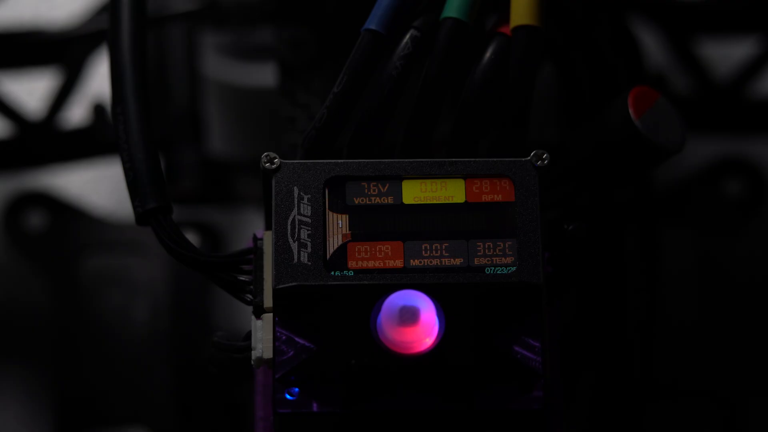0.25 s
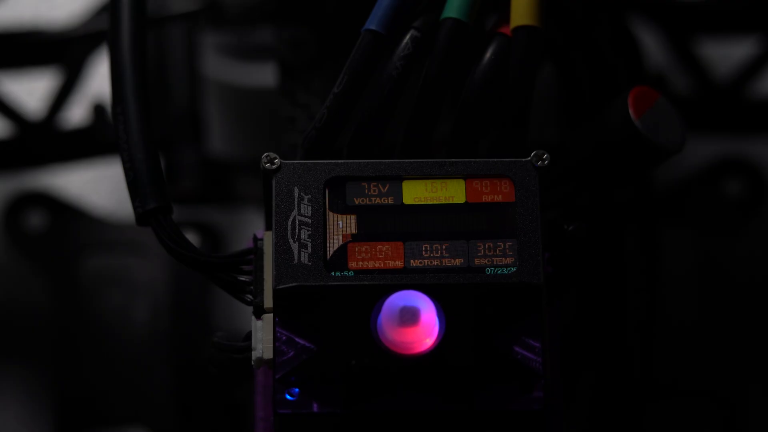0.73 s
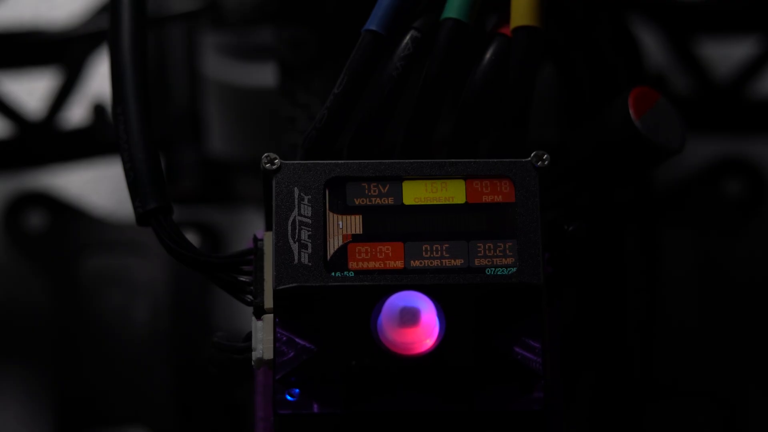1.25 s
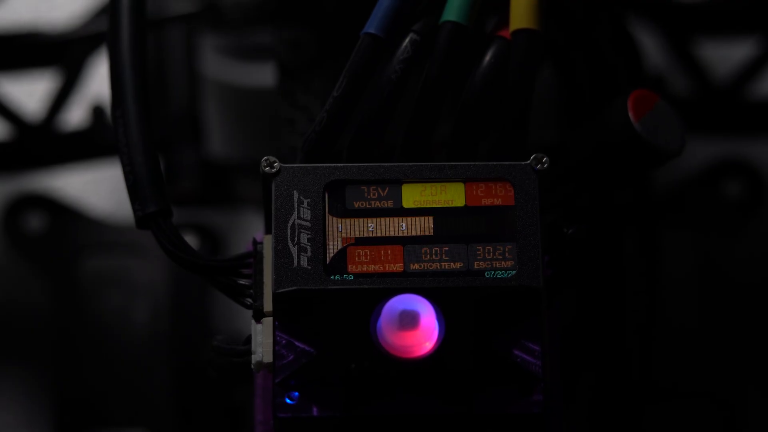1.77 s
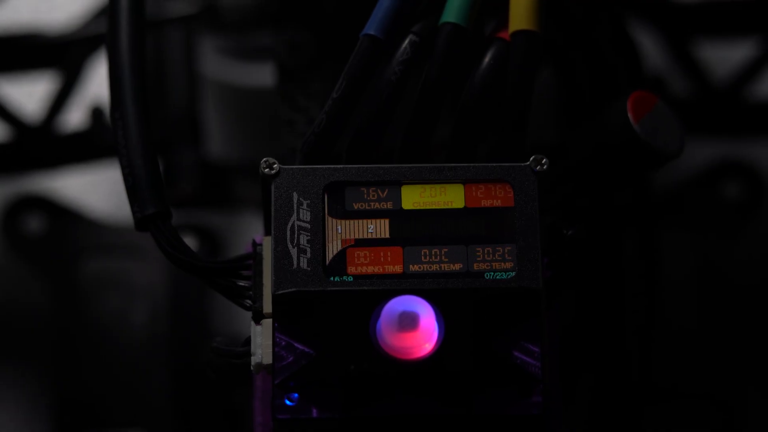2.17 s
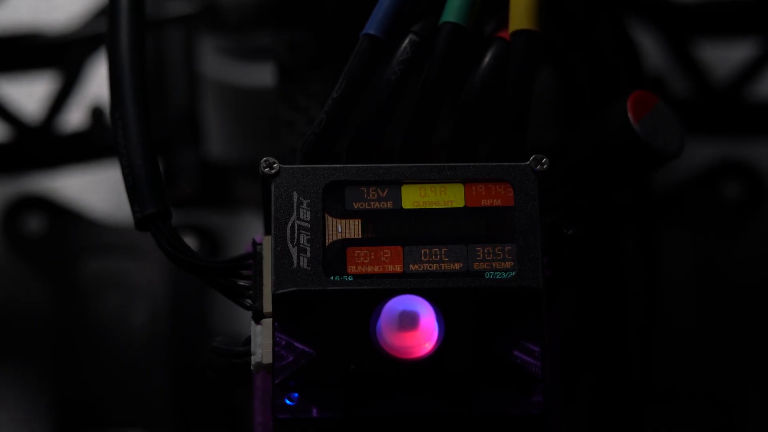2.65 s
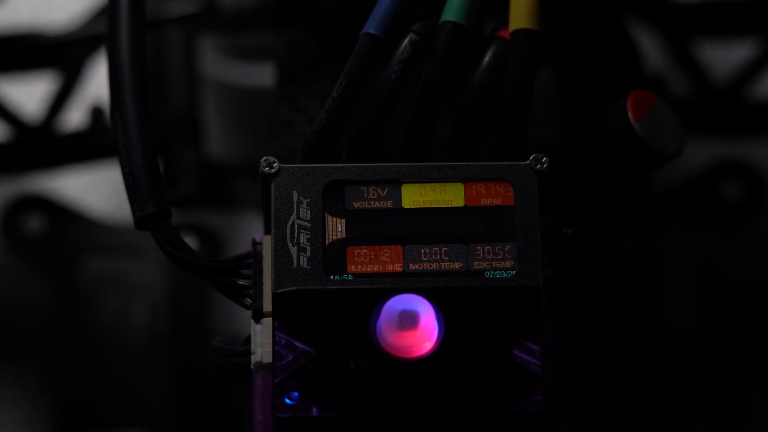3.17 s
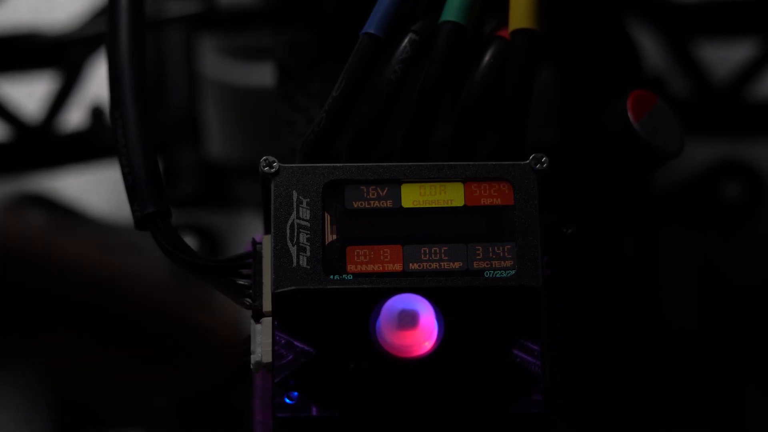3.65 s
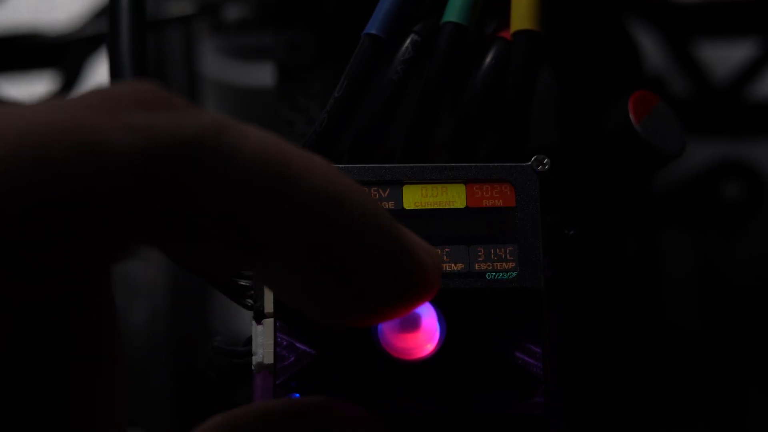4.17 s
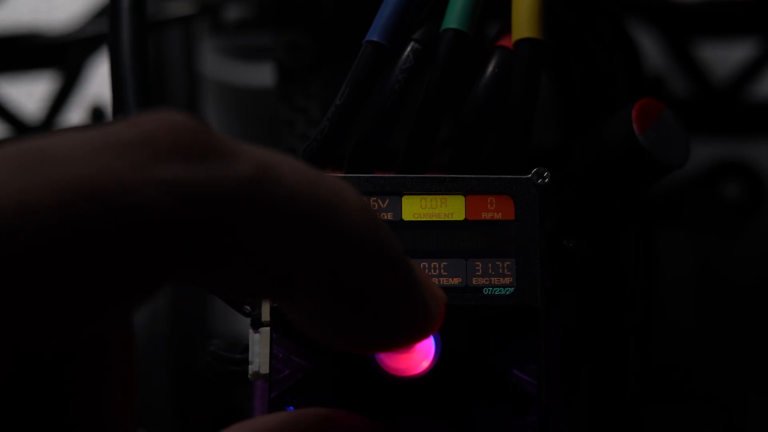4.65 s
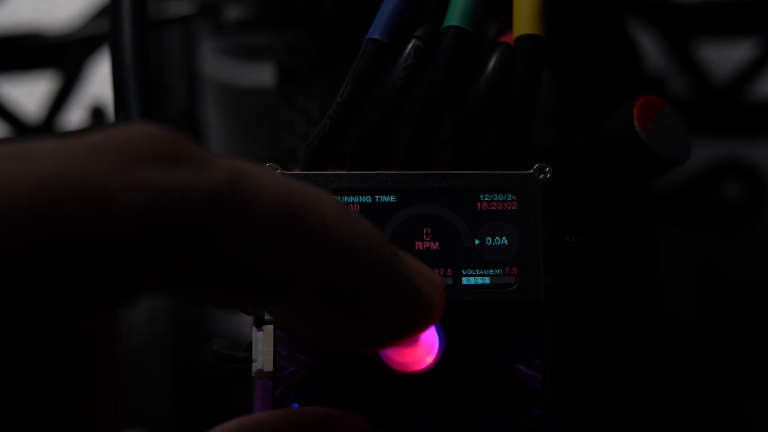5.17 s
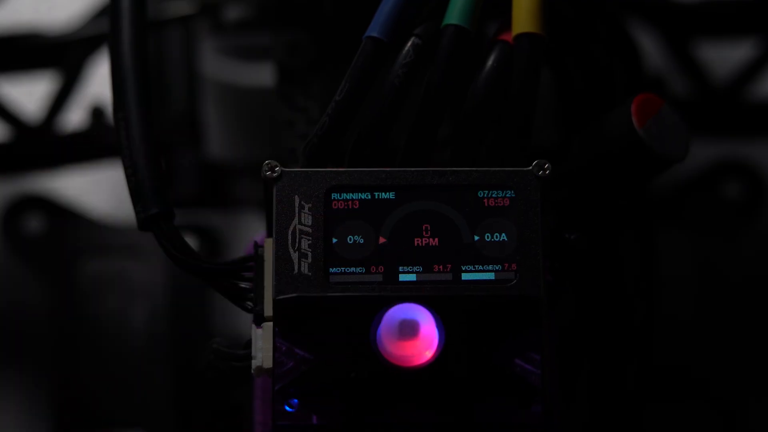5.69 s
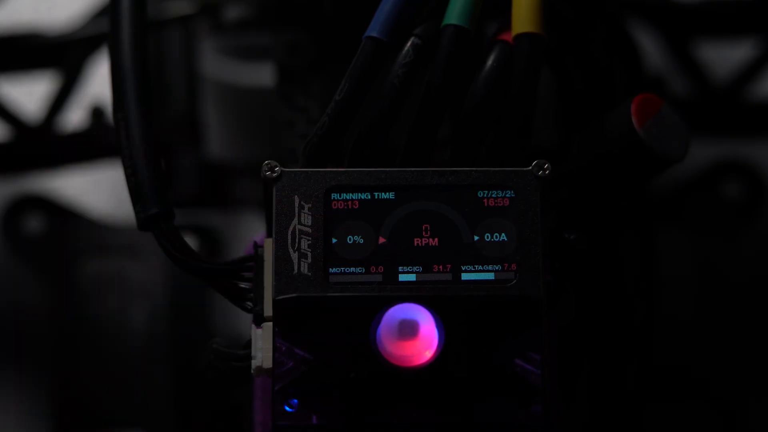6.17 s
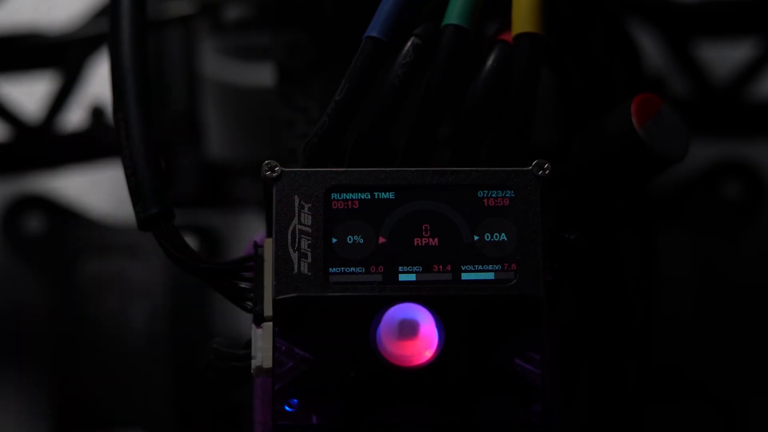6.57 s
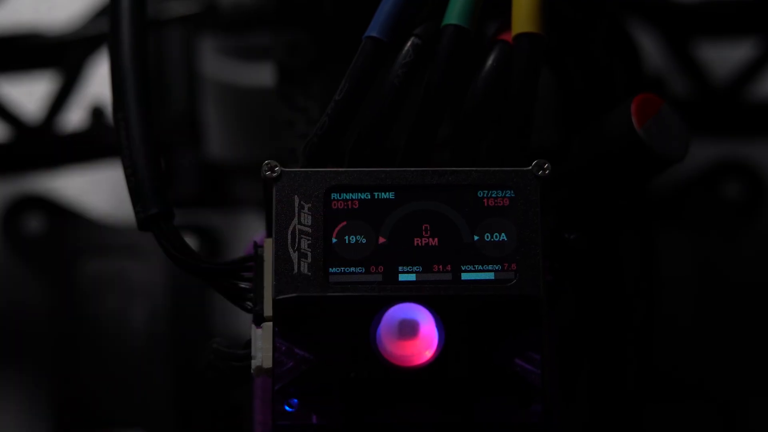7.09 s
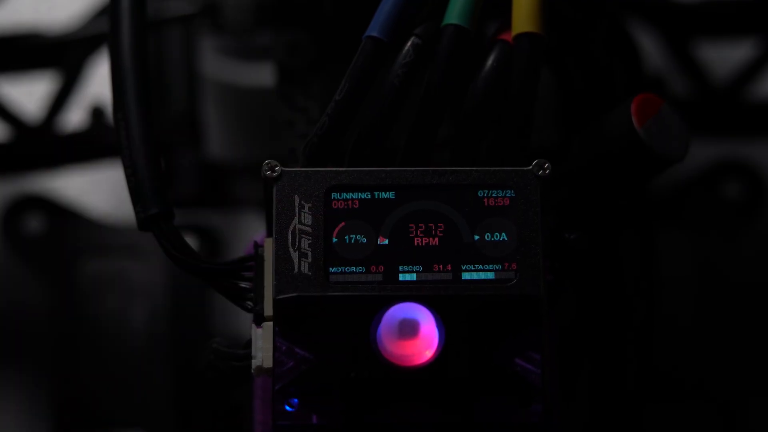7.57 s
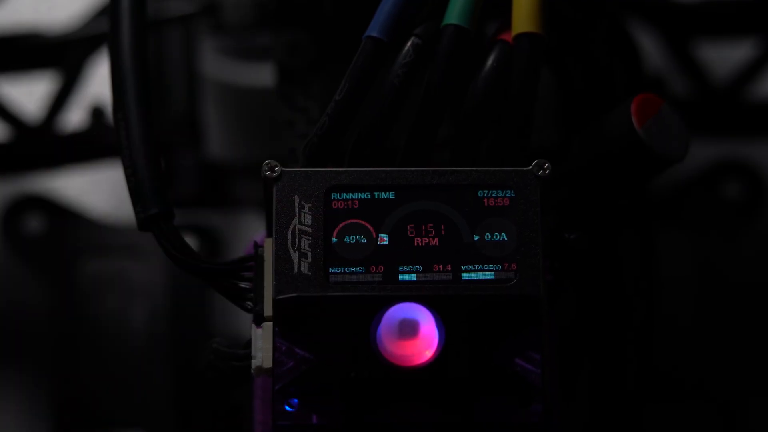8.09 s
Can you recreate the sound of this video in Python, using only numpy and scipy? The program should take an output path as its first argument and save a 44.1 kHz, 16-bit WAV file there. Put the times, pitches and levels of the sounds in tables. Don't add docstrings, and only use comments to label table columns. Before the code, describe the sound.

Close stereo pickup, dry, bass-light and bright. A gritty, buzzing gear whir rises slowly, leaps to a strained whine, drops as the throttle closes and sinks through a freewheeling rattle to a few fine ticks. Fan hiss with a faint high tone swells in the pause, with two faint finger rubs. Four short rattling revs follow, the hiss suddenly pushed back behind them.

```python
import sys
import numpy as np
from scipy import signal
from scipy.fft import rfft, irfft, next_fast_len
from scipy.io import wavfile
from scipy.ndimage import map_coordinates

SR = 44100
rng = np.random.default_rng(int(sys.argv[2]) if len(sys.argv) > 2 else 0)


def linear_from_db(decibels):
    return 10 ** (np.asarray(decibels, float) / 20)


def to_wav(s):
    ch = np.atleast_2d(s).T
    pcm = np.round(np.clip(ch, -1, 1) * 32767)
    wavfile.write(sys.argv[1], SR, pcm.astype(np.int16))


N = 367794

# opens [s], top speed reached [s], closes [s], top shaft speed [Hz], tooth noise [dB].
THROTTLE_BLIPS = [
    (7.045, 7.195, 7.18, 180.6, -24.5),
    (7.549, 7.669, 7.74, 183.8, -24.5),
    (7.9, 8.02, 8.072, 203, -22),
    (8.27, 8.425, 8.4, 185, -22.5),
]
# centre [Hz], width [Hz], level [dB].
LOW_MODES = [(200, 170, -16.5), (337, 35, -7), (425.4, 27, -2), (677, 43, -1.5), (758.7, 11.3, 7),
             (929, 39.6, 6), (1027, 57, 2), (1367, 420, -2)]


def unit(x):
    return x / np.sqrt(np.mean(x ** 2) + 1e-20)


def along(points, hz):
    f, v = np.transpose(points)
    return np.interp(np.log(hz + 1), np.log(f + 1), v)


def curves(rows):
    s, *cols = np.transpose(rows)
    return [np.interp(np.arange(N) / SR, s, c) for c in cols]


def wobble(rate):
    knots = rng.standard_normal(int(N * rate / SR) + 4)
    fine = map_coordinates(knots, [np.arange(8 * len(knots)) / 8])
    return np.interp(np.arange(N) * rate / SR * 8, np.arange(len(fine)), fine)


def filtered(x, response):
    m = next_fast_len(N + SR // 2)
    return irfft(rfft(x, m) * response(np.fft.rfftfreq(m, 1 / SR)), m)[..., :N]


def modes(table):
    def response(f):
        total = 0
        for k, (centre, width, db) in enumerate(table):
            drag = 1j * f * width
            total = total + (-1) ** k * linear_from_db(db) * drag / (centre * centre - f * f + drag)
        return total
    return response


def stirred(response):
    return unit(filtered(rng.standard_normal((2, N)), response))


def spread(pair):
    # frequency [Hz], left-right likeness [0-1].
    likeness = [(60, 0.73), (125, 0.99), (300, 1), (700, 0.74), (1500, 0.56), (3000, 0.41), (6000, 0.62),
                (10000, 0.26), (15000, 0.39)]
    turn = lambda hz: np.arccos(np.clip(along(likeness, hz), -1, 1)) / 2
    mid, side = filtered(pair, lambda hz: np.array([np.cos(turn(hz)), np.sin(turn(hz))]))
    return np.array([mid + side, mid - side])


def fan():
    # frequency [Hz], level [dB per Hz].
    air_spectrum = [(35, -64), (60, -32), (218, -28.5), (296, -22), (410, -23), (1490, -20), (2220, -13.5),
                    (3080, -15.5), (3310, -11), (4490, -4), (6230, -13), (7010, -8.5), (12000, -15.5),
                    (13800, -12.5), (16300, -21.5)]
    # time [s], blade tone [Hz].
    blade_pitch = [(0, 3150), (3.8, 3165), (4.4, 3180), (4.87, 3226), (5.55, 3250), (6.4, 3378),
                   (8.34, 3380)]
    song_levels = [-16, -25.5, -25.5]
    # centre [s], half length [s], lift [dB].
    cupped = [
        [(5.17, .42, 7)],
        [(4.45, .2, 11), (5.7, .12, 6)],
        [(4.95, .42, 7)],
    ]
    t, blip_s = np.arange(N) / SR, THROTTLE_BLIPS[0][0]

    creep_db = 3 * (np.minimum(t, blip_s) - 3.8) * np.where(t < 3.8, .3, 1)
    duck_db, duck_s = 9, .25
    hiss_db = -45.5 + creep_db - duck_db * np.clip((t - blip_s) / duck_s, 0, 1)
    air = linear_from_db(0.83 * wobble(700) + 0.34 * wobble(8)) * rng.standard_normal((2, N))
    hiss = linear_from_db(hiss_db) * unit(filtered(air, lambda hz: linear_from_db(along(air_spectrum, hz))))

    blade_hz, = curves(blade_pitch)
    blade_turns = np.cumsum(blade_hz * (1 + 0.00086 * wobble(30))) / SR
    song = 0
    for k, (db, lifts) in enumerate(zip(song_levels, cupped), 1):
        hand_db = sum(lift_db * np.exp(-((t - s) / half_s) ** 4) for s, half_s, lift_db in lifts)
        line_db = hiss_db - 0.23 * creep_db + db + hand_db
        line = np.sin(2 * np.pi * (k * blade_turns + rng.random((2, 1)))) * [[1.25], [.3]]
        song = song + linear_from_db(line_db + 5 + 1.8 * wobble(7.7)) * line
    return spread(hiss + song)


def finger():
    # start [s], length [s], level [dB].
    rubs = [
        (4.561, 0.4, -54.5),
        (4.942, 0.42, -54.5),
        (6.28, .06, -62),
    ]
    # centre [Hz], width [Hz], level [dB].
    rub_modes = [(333, 72, -9), (439, 18, 1.5), (845, 250, -9.5), (1700, 720, -11)]
    t = np.arange(N) / SR
    stroke = sum(linear_from_db(db) * np.sin(np.pi * np.clip((t - s) / length, 0, 1) ** 0.46) for s, length, db in rubs)
    contact = linear_from_db(-51 - 60 * np.abs(t - 4.44) / 0.16)
    touch = contact * stirred(modes([(520, 120, -8), (1100, 390, -6), (1810, 440, -7)]))
    return spread(touch + stroke * stirred(modes(rub_modes)))


def chatter(count):
    until_s = 1.4
    when, size = rng.random(count), rng.uniform(-1, 1, (count, 2))
    start_s = (np.arange(count) + when) / count * until_s
    return list(zip(start_s, -13.5 + 5 * size[:, 0], -20 + 4 * size[:, 1]))


def slack():
    # time [s], peak level [dB], dull part [dB].
    ticks = [(3.7374, -41, -4), (3.7634, -48, -1), (3.7868, -38, -3), (3.8167, -31, -10), (7.1155, -30, -3),
             (7.1585, -21, -4), (7.205, -12, -6.5), (7.5535, -29, -1), (7.6011, -27, -9), (7.6547, -20, -4),
             (7.6955, -11, -17), (7.7899, -29, -7), (7.9079, -17, -8), (7.9526, -28, -5), (7.976, -19, -2),
             (8.0059, -21, -7), (8.0513, -26, -12), (8.307, -12.5, -9)]
    out, t = np.zeros((2, N + SR)), np.arange(SR // 50) / SR
    for s, db, dull_db in chatter(count=26) + list(ticks):
        ring_hz = 12000 * (1 + rng.normal(0, 0.036, (2, 1)))
        dull_hz = 6800 * (1 + rng.normal(0, 0.11, (2, 1)))
        ring = linear_from_db(-60 * t / 0.0089) * np.sin(2 * np.pi * ring_hz * t)
        dull = linear_from_db(dull_db + 7.5 - 60 * t / 0.012) * np.sin(2 * np.pi * dull_hz * t)
        onset = 1 - np.exp(-t / 0.00047)
        out[:, round(s * SR):][:, :len(t)] += linear_from_db(db + 4.5) * onset * (ring + dull)
    return spread(out[:, :N])


def throttle():
    # time [s], shaft speed [Hz], tooth noise [dB].
    long_run = [(0, 134, -20), (.2, 148, -19.5), (.5, 160, -19.5), (.86, 198, -19), (1.15, 210, -19.5),
                (1.42, 272, -19.5), (1.55, 551, -19.5), (1.68, 632, -19.5), (1.78, 654, -19),
                (2.022, 657, -19), (2.075, 480, -20.5), (2.13, 368, -21), (2.27, 316, -21.3),
                (2.8, 185, -30), (3.26, 94, -40), (3.52, 62, -44), (3.835, 33, -45), (4, 20, -75)]
    start_hz, start_db, swell_s = 84.2, -58, 0.046
    hold_s, settle_hz, settle_s = .055, 100, .19
    sag_db, sag_s = 8.5, 0.13
    t = np.arange(N) / SR
    speed, noise_db = curves(long_run)
    for opens, top_s, closes, top_hz, db in THROTTLE_BLIPS:
        now, since = t >= opens, np.clip(t - opens, 0, None)
        from_hz, from_db = max(speed[now][0], start_hz), max(noise_db[now][0], start_db)
        rise = np.clip(since / (top_s - opens), 0, 1) ** 1.4
        sink = 1 - np.exp(-np.clip(t - top_s - hold_s, 0, None) / settle_s)
        sag = 1 - np.exp(-np.clip(t - closes, 0, None) / sag_s)
        blip_hz = from_hz + (top_hz - from_hz) * rise - (top_hz - settle_hz) * sink
        blip_db = db + (from_db - db) * np.exp(-since / swell_s) - sag_db * sag
        speed = np.where(now, blip_hz, speed)
        noise_db = np.where(now, blip_db, noise_db)
    return speed, noise_db, t >= THROTTLE_BLIPS[0][0]


def layer_db(law, span_hz, speed, noise_db, blips):
    base_db, follows, per_octave_db, lowest_db, lift_db = law
    octaves = np.log2(np.clip(speed, *span_hz) / 200)
    level_db = base_db + follows * (noise_db + 20) + per_octave_db * octaves
    stands = np.clip((-46 - noise_db) / 29, 0, 1)
    return np.maximum(level_db + lift_db * blips, lowest_db) - 35 * stands ** 2


def rattle(turns, body, once, grit_db):
    strength = linear_from_db(once * np.cos(2 * np.pi * turns) + grit_db * wobble(900) + 0.6 * wobble(25))
    return unit(filtered(strength * rng.standard_normal((2, N)), modes(body)))


def gear_teeth(turns, speed, tooth_db, blips, pull):
    # centre [Hz], width [Hz], level [dB].
    shell_modes = [(2129, 89, -2), (2250, 59, 1.5), (2385, 110, -4), (2510, 180, -7), (2700, 59, -1)]
    case_modes = [(2630, 42, -4), (2990, 1470, -8.5), (3554, 72, 2.5), (3763, 30, 4), (3890, 106, 0.5),
                  (4178, 126, -1.5), (4470, 74, 2.5), (5140, 1630, -8)]
    gear_modes = [(5700, 31, 1), (6140, 330, -7), (6364, 53, 4.5), (6574, 100, 0.5), (6900, 300, 0),
                  (7174, 124, 2.5), (7335, 173, 4), (7640, 1000, -3.5), (8900, 320, 2.5), (9820, 4800, -6),
                  (12830, 700, -1), (13270, 750, -5), (14500, 1150, -6.5), (15600, 900, -11.5)]
    state = (139, 416), speed, tooth_db, blips
    rumble_db = layer_db((-38.5, 0.93, -4, -51, 5.5), *state)
    rasp_db = layer_db((-36, 0.87, -5, -70, 7.5), *state)
    clatter_db = layer_db((-24, 0.81, -4, -70, 1.8), *state)
    rasp_db = rasp_db + 6.5 * (pull == 0) * np.exp(-(np.log2(speed / 112) / 0.71) ** 2)
    noise = linear_from_db(rumble_db) * rattle(turns, LOW_MODES, once=3.7, grit_db=0.5)
    noise += linear_from_db(rasp_db) * rattle(turns, shell_modes, once=1.3, grit_db=1.0)
    noise += linear_from_db(clatter_db) * rattle(turns, case_modes, once=0.82, grit_db=1.5)
    noise += linear_from_db(tooth_db) * rattle(turns, gear_modes, once=1.6, grit_db=1.5)
    return noise


def mesh_whistle(turns, speed, tooth_db, pull):
    mesh = np.array([wobble(2200), wobble(2200)]) * np.cos(2 * np.pi * 28 * turns)
    mesh = unit(filtered(mesh, modes([(12400, 4100, 0)]))) * (speed < 560)
    return linear_from_db(tooth_db - 11.5 + 1.3 * wobble(30.2)) * mesh * (0.54 + 0.41 * pull)


def tone(turns, order, db):
    line = np.sin(2 * np.pi * (order * turns + rng.random((2, 1))))
    return linear_from_db(db + 1.85 * wobble(22)) * line * [[1], [.6]]


def stack(turns, levels, order):
    return sum(tone(turns, k, db) for k, db in enumerate(levels, order))


def shaft_whine(turns, speed, pull):
    growl_levels = [2, 2.5, -3.5, 0, -5, 1, 4]
    whine_levels = [-14, -20, -9, 0, 1, -2, -4, 0, -8, -2, -5, -9, -7]
    coast_levels = [-6, -14, -14, -10, 2, -12, -12, -6, 4, -10]
    # frequency [Hz], level [dB].
    growl_path = [(250, -13), (430, -9.5), (700, -8), (1000, -1), (1400, -6), (2000, -4)]
    path = lambda hz: linear_from_db(along(growl_path, hz)) * (0.54 + 0.7 * modes(LOW_MODES)(hz))
    fast = np.clip((speed - 470) / 80, 0, 1)
    growl = filtered(pull * (1 - fast) * stack(turns, growl_levels, order=2), path)
    whine = linear_from_db(6.5) * (speed / speed.max()) ** 3 * pull * fast * stack(turns, whine_levels, order=4)
    case_and_shell = modes([(2200, 160, -7), (3850, 370, 0.0)])
    coast = linear_from_db(11.5) * filtered((1 - pull) * stack(turns, coast_levels, order=7), case_and_shell)
    return growl + whine + coast


def unbalance_hum(turns, speed, pull):
    hum = tone(turns, order=1, db=2)
    hum = hum + tone(turns, order=.348, db=-13) * pull
    hum = hum + tone(turns, order=4, db=-11) * (speed < 66)
    return hum + tone(turns, order=2, db=-3.5) * ((speed < 160) | (speed > 500))


def motor():
    # time [s], pull on the motor [0-1].
    pull_rows = [(0, 1), (2.02, 1), (2.06, 0), (7, 0), (7.1, .3), (8.34, .3)]
    speed, tooth_db, blips = throttle()
    pull, = curves(pull_rows)
    turns = np.cumsum(speed * (1 + 0.00176 * wobble(40))) / SR
    noise = gear_teeth(turns, speed, tooth_db, blips, pull) + mesh_whistle(turns, speed, tooth_db, pull)

    state = (152, 700), speed, tooth_db, blips
    whine_db = layer_db((-39.5, 2.1, 0.4, -59, 3), *state)
    hum_db = layer_db((-58, -0.1, 7.5, -61.5, 4.5), *state)
    whine = linear_from_db(whine_db) * shaft_whine(turns, speed, pull)
    hum = linear_from_db(hum_db + 4.3 * wobble(16)) * unbalance_hum(turns, speed, pull)
    hum = filtered(hum, lambda hz: 1 / (1 + (138 / (hz + 1)) ** 16))
    shake = linear_from_db(tooth_db - 48 + 3.5 * wobble(10.9)) * stirred(lambda hz: 1 / (1 + (hz / 45) ** 3))
    return spread(noise + whine + shake + hum)


def scene():
    return fan() + finger() + slack() + motor()


def band_limit(x):
    return signal.sosfilt(signal.butter(12, 16680, fs=SR, output="sos"), x)


def record(dry):
    # frequency [Hz], left minus right [dB].
    lean = [(60, 0.0), (110, 0.0), (200, -0.2), (380, 0), (700, -1.5), (1290, -1), (2380, -3), (4400, -2.0),
            (8120, -6.5), (15000, -1)]
    # frequency [Hz], phase by which left leads [radians].
    lead = [(0, -3.7), (2070, -0.25), (4130, -0.6), (4390, 0.4), (6030, 0.3), (6370, 0.5), (6630, 0.27),
            (7410, 0.43), (7670, 1.3), (9560, 0.35), (12300, -0.9), (13800, -3.3), (14500, 0.3),
            (16300, -0.4)]
    half = np.array([[.5], [-.5]])

    def microphones(hz):
        level = linear_from_db(along(lean, hz) * half)
        phase = along(lead[1:], hz) * np.clip(hz / 2000, 0, 1) * half
        band = (hz < 15900) / (1 + (60 / (hz + 1)) ** 3.3)
        return level * np.exp(1j * phase) * band

    return band_limit(filtered(dry, microphones))


dry = scene()
out = record(dry)
to_wav(out)
```